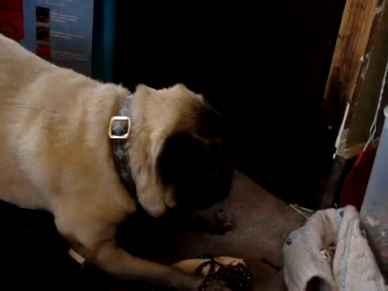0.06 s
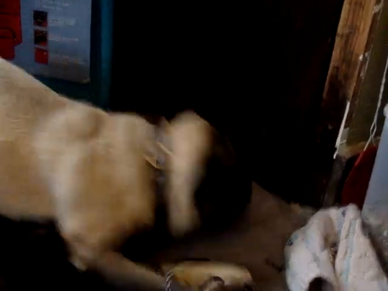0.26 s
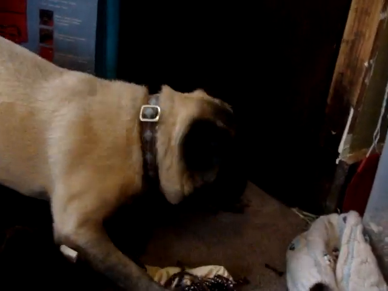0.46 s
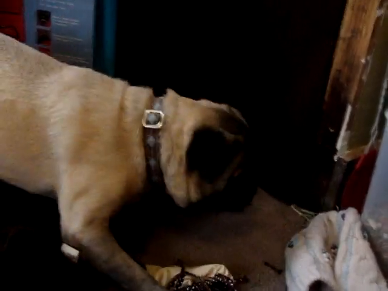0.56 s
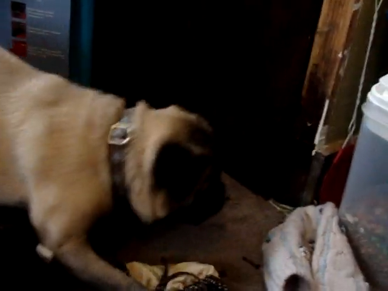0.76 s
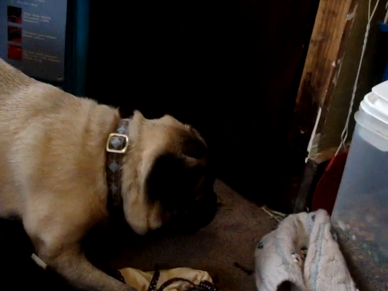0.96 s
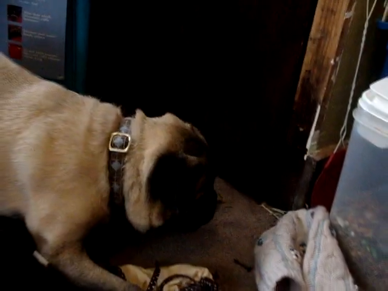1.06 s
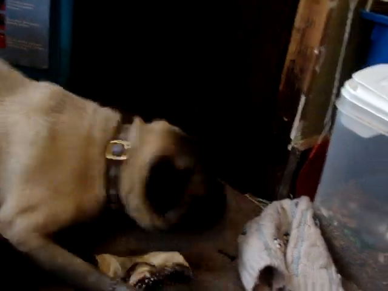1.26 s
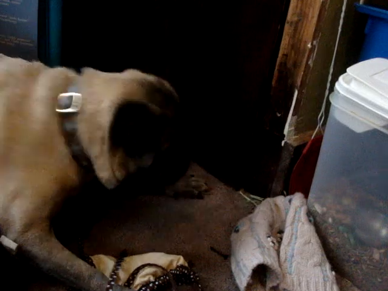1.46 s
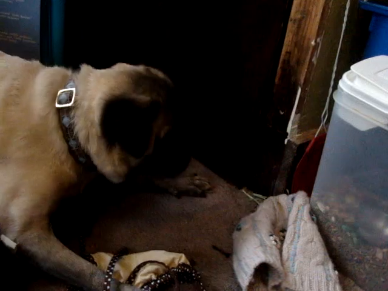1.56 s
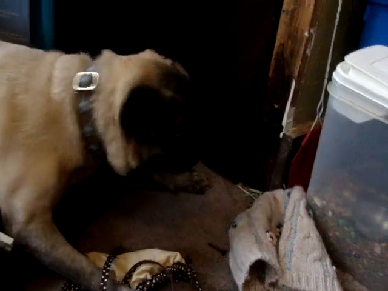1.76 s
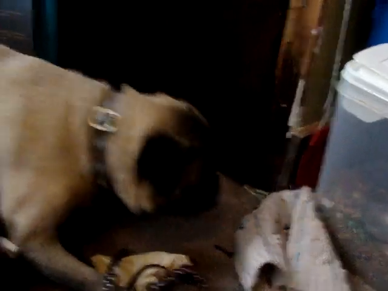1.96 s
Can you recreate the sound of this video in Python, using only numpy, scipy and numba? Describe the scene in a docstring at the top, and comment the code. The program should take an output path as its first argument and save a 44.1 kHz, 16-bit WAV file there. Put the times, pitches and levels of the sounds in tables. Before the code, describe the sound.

A small dog barks sharply three times close by, whimpering and wheezing, in a quiet room.

```python
"""In a quiet, soft room a small flat-faced dog barks three times close by; a whimper joins the last two.
Its larynx runs two oscillators at once, clean as the bark rises, rough and noisy at full force, and
the resonances of throat, mouth and muzzle filter this source. Between barks turbulent air wheezes in
the narrow nose and the soft palate flutters. Thin whistles sound between and during the calls, with a
bright 4 kHz edge as the second bark starts. The paws thump once over a steady hush."""
import sys
import numpy as np
from scipy import signal
from scipy.fft import rfft, irfft
from scipy.io import wavfile
from scipy.ndimage import uniform_filter1d
from numba import njit

SR = 44100
rng = np.random.default_rng(int(sys.argv[2]) if len(sys.argv) > 2 else 0)


def materialize(psi):
    """Save the field psi as 16-bit PCM at rate SR to the path in sys.argv[1].

    A 1-D psi becomes a single channel; in a 2-D psi each row is a channel.
    """
    bounded = np.clip(np.atleast_2d(psi).T, -1, 1)
    quanta = np.round(bounded * 32767).astype(np.int16)
    wavfile.write(sys.argv[1], SR, quanta)


N = 88200

# spectrum of the room's hush: f/Hz, relative density/dB
HUSH_SPECTRUM = [(25, -8), (112, -6.5), (204, -3.5), (3030, -15), (5260, -13.5), (9820, -20.5)]
# wheezing breaths, one list each: t/s, level/dB
BREATHS = [
    [(.125, -47), (.148, -41), (.153, -31.5), (.18, -36.5), (.22, -36)],
    [(.61, -58), (.65, -59), (.82, -53.5), (.9, -47), (.93, -68.5), (1.14, -55.5), (1.17, -47.5),
     (1.2, -60)],
    [(1.94, -70.5), (1.99, -58)],
]
# nasal resonances: f/Hz, bandwidth/Hz, gain/dB
NOSE_RESONANCES = [(556, 560, 3.5), (1495, 1600, -5.5), (2770, 560, 2.5), (5210, 810, -1.5),
                   (8160, 5800, -15.5)]
# thin whistles and the second bark's bright edge: t/s, duration/s, starting f/Hz, final f/Hz, level/dB
WHISTLE_GLIDES = [(0.149, 0.031, 2950, 3820, -31), (0.623, .11, 2930, 2860, -51.5),
                  (0.764, 0.142, 2830, 2700, -56), (1.224, 0.047, 3940, 4370, -34),
                  (1.389, 0.096, 3130, 2670, -39.5)]
# flaps of the soft palate: t/s, level/dB, extra gain of the lowest mode/dB
PALATE_FLAPS = [(0.152, -30.5, -1), (0.69, -49, 4.5), (0.725, -47.5, -2), (0.859, -34.5, 1),
                (0.89, -43.5, -10), (0.908, -48.5, 7), (1.143, -45.5, 14), (1.174, -35, -2),
                (1.194, -34, 0.5)]
# airway modes struck by a flap: f/Hz, gain/dB, T60/s
AIRWAY_MODES = [(184, 2, 0.046), (516, 9.5, 0.02), (1160, 1, 0.0039), (4070, 1.5, 0.0044)]
# paws shifting on the floor: t/s, impulse level/dB
PAW_THUMPS = [(0.192, -23.5)]
# upper vibration of the vocal folds: t/s, f/Hz, roughness (0 clean, about 1 noisy)
UPPER_VIBRATION = [(.24, 522, 0), (.265, 653.4, 0.06), (.283, 707.7, 0.13), (.29, 762, 0.8),
                   (.33, 695.7, 0.72), (.375, 788.3, 0.82), (.388, 729.7, 0.31), (.408, 553, 0.39),
                   (.415, 598.2, 1.02), (1.23, 591.3, .3), (1.28, 636.5, 0.51), (1.31, 680.2, 0.42),
                   (1.345, 655.1, 0.55), (1.375, 698.8, 0.54), (1.41, 427.8, 0.58), (1.45, 301.8, 0.59),
                   (1.515, 266.4, 0.41), (1.55, 464.3, 0.07), (1.585, 627.7, 0.07), (1.612, 728.5, 0.06),
                   (1.626, 741.7, 0.84), (1.7, 740, 0.81), (1.73, 656.8, 0.6), (1.785, 242, 0.57),
                   (1.8, 207.9, 1.06)]
# lower vibration: t/s, f/Hz, weight relative to the upper/dB
LOWER_VIBRATION = [(.225, 323.7, 43), (.236, 354.6, 6.5), (.245, 358.8, -5), (.275, 431, -8),
                   (.3, 485.3, -1.5), (.36, 449.8, -4.5), (.42, 389.4, -28), (1.225, 200.4, 7),
                   (1.24, 327.7, 45), (1.255, 429.5, 25.5), (1.28, 480, -5.5), (1.345, 466, -1),
                   (1.375, 335.6, -15), (1.42, 207.3, -2), (1.45, 200.1, -46), (1.6, 441.7, -25),
                   (1.625, 460.9, 3), (1.69, 476.2, -24.5), (1.72, 457.6, -15)]
# calls, one list each: t/s, throat level/dB, mouth level/dB re throat, muzzle level/dB re throat
CALL_LEVELS = [
    [(.222, -35.5, -28, -12), (.238, -21.5, -41, -13), (.244, -8.5, -15.5, -38), (.28, -12.5, -4.5, -20),
     (.294, -16, -4.5, -1), (.334, -14.5, -4, -25), (.378, -22.5, -3, -3.5), (.4, -16.5, -17, -12.5),
     (.412, -32.5, -8.5, -3.5), (.54, -50, -2, 2.5), (.59, -61, -2, -9)],
    [(1.228, -13, -30, -32), (1.24, -16, -5.5, -12), (1.26, -9, -11, -12.5), (1.284, -14.5, -7, -7.5),
     (1.318, -10.5, -10.5, -32.5), (1.34, -15.5, -12.5, -0.5), (1.37, -17, -12, -12),
     (1.41, -29, -8.5, -15), (1.48, -32.5, -18.5, -16), (1.538, -30, -12.5, -24.5), (1.572, -18, 2.5, 4.5),
     (1.586, -8.5, -9.5, -28), (1.61, -22, 10, 6), (1.69, -22, 7, -20), (1.74, -31, 3, -5.5),
     (1.79, -41.5, -3.5, -9.5), (1.91, -69, 2.5, 10.5)],
]
# formants moving as the mouth opens and shuts: t/s, throat f/Hz, mouth f/Hz
FORMANT_PATHS = [(0.229, 346, 1320), (0.248, 497, 1660), (0.281, 840, 1760), (0.391, 673, 1770),
                 (1.227, 581.7, 1604), (1.255, 914.6, 1501), (1.284, 664.2, 1415), (1.349, 689.1, 1775),
                 (1.39, 665.6, 1528), (1.452, 327.4, 1336), (1.521, 293, 1350), (1.552, 463, 1450),
                 (1.578, 594, 1870), (1.613, 640, 1920), (1.63, 660, 1364), (1.719, 655, 1530),
                 (1.785, 276, 1480), (1.813, 462, 1437)]
# stationary resonances of muzzle, rasp and hiss: f/Hz, bandwidth/Hz, gain/dB
MUZZLE_RESONANCES = [(2820, 650, 0)]
RASP_RESONANCES = [(3604, 380, 5), (5010, 770, 0)]
HISS_RESONANCES = [(6240, 350, 3.5), (8510, 770, -1)]
# treble of the calls: t/s, rasp level/dB re throat, hiss level/dB re throat
TREBLE_LEVELS = [(.26, -26.5, -40), (.3, -13, -31), (.4, -14.5, -32), (.42, -4, -16), (1.245, -18, -25.5),
                 (1.285, -23.5, -41), (1.345, -6.5, -31.5), (1.5, -36.5, -30), (1.575, -25.5, -37.5),
                 (1.62, -4, -29), (1.75, -21.5, -25)]

JITTER, SHIMMER_DB = 0.15, 9.5  # spread of relative pitch and of level at roughness 1
BREATHY_DB, COUPLING = 2, 0.41
FORMANT_WIDTHS_HZ, FORMANT_BYPASS = (320, 383), 0.1  # throat and mouth; share passing unfiltered
HUSH_DB, ROOM_DB = -55, -12


def amp(db):
    """Amplitude ratio: a factor of ten per 20 dB."""
    return 10 ** (np.asarray(db) / 20)


def curves(rows):
    """Linear interpolation of each column over time."""
    times, *columns = np.transpose(rows)
    return [np.interp(np.arange(N) / SR, times, column) for column in columns]


def envelopes(events):
    """Interpolation of successive events, each rising from and falling to -90 dB."""
    rows = []
    for event in events:
        first, last = event[0], event[-1]
        rows += [(first[0] - .004, -90, *first[2:]), *event, (last[0] + .02, -90, *last[2:])]
    return curves(rows)


def drift(rate_hz):
    """Low-pass filtering of noise gives a slow fluctuation of unit variance."""
    r = np.exp(-2 * np.pi * rate_hz / SR)
    slow = signal.lfilter([1], [1, -2 * r, r * r], rng.standard_normal(N + 4000))[4000:]
    return slow / slow.std()


def unit_band(x, band_hz):
    """Band-pass filtering, then division by the running RMS, gives a band of unit level."""
    band = signal.sosfilt(signal.butter(2, band_hz, "band", fs=SR, output="sos"), x)
    return band / np.sqrt(uniform_filter1d(band ** 2, 450) + 1e-12)


def resonate(x, resonances):
    """Superposition of parallel resonators with alternating signs."""
    out = 0
    for k, (hz, width_hz, db) in enumerate(resonances):
        r = np.exp(-np.pi * width_hz / SR)
        poles = [1, -2 * r * np.cos(2 * np.pi * hz / SR), r * r]
        out += (-1) ** k * amp(db) * signal.lfilter([(1 - r * r) / 2, 0, (r * r - 1) / 2], poles, x)
    return out


@njit
def glide(x, hz, width_hz):
    """Forced response of a resonator whose centre frequency moves."""
    turn, r = 2 * np.pi * hz / SR, np.exp(-np.pi * width_hz / SR)
    y = np.zeros(len(x))
    for i in range(2, len(x)):
        y[i] = (1 - r * r) / 2 * (x[i] - x[i - 2]) + 2 * r * np.cos(turn[i]) * y[i - 1] - r * r * y[i - 2]
    return y


def ring(times, gains, hz, t60_s):
    """Impulse response of a damped mode: each impulse starts a decaying sinusoid."""
    impulses = np.zeros(N) + 1e-18
    impulses[(times * SR).astype(int)] = gains
    r, turn = amp(-60 / (t60_s * SR)), 2 * np.pi * hz / SR
    return signal.lfilter([0, np.sin(turn)], [1, -2 * r * np.cos(turn), r * r], impulses)


def room_hush():
    """Stationary noise: white noise weighted by a fixed spectrum."""
    hz, db = np.transpose(HUSH_SPECTRUM)
    bins_hz = np.maximum(np.arange(N // 2 + 1) * SR / N, 1)
    weights = amp(np.interp(np.log(bins_hz), np.log(hz), db))
    noise = irfft(rfft(rng.standard_normal(N)) * weights, N)
    return amp(HUSH_DB) * noise / noise.std()


def nose_wheeze():
    """Turbulence excites the broad resonances of the narrow nose."""
    turbulence = rng.standard_normal(N) * amp(2.0 * drift(66))
    air = resonate(turbulence, NOSE_RESONANCES)
    return amp(envelopes(BREATHS)[0]) * air / air.std()


def whistles(width_hz=160):
    """Sharp resonance selects a gliding pitch from noise: thin whistles and a bark's bright edge."""
    t, air, out = np.arange(N) / SR, rng.standard_normal(N), 0
    for start, duration, from_hz, to_hz, db in WHISTLE_GLIDES:
        progress = np.clip((t - start) / duration, 0, 1)
        hz = from_hz + (to_hz - from_hz) * progress
        tone = glide(glide(air, hz, width_hz), hz, width_hz)
        swell = np.sqrt(np.abs(np.sin(np.pi * progress)))
        out += amp(db) * swell * tone / tone.std()
    return out


def palate_flutter():
    """Impulsive excitation: each flap of the palate sets the airway's modes ringing briefly."""
    times, db, dull_db = np.transpose(PALATE_FLAPS)
    return sum(ring(times, amp(db + mode_db + (dull_db if k == 0 else 0)), hz, t60_s)
               for k, (hz, mode_db, t60_s) in enumerate(AIRWAY_MODES))


def paw_thump():
    """A soft impact spreads its force over time and rings one low, damped mode."""
    times, db = np.transpose(PAW_THUMPS)
    return uniform_filter1d(ring(times, amp(db), hz=70.2, t60_s=0.052), size=150)


def fold_vibration(pitch_hz, roughness, tilt, top_hz=4600):
    """A harmonic series, modulated at random in pitch and amplitude; returns sound and phase."""
    phase = 2 * np.pi * np.cumsum(pitch_hz * (1 + JITTER * roughness * drift(137.84))) / SR
    tone = sum(np.cos(k * phase + k * k) * k ** -tilt * np.clip((top_hz - k * pitch_hz) / 800, 0, 1)
               for k in range(1, 22))
    return tone * amp(SHIMMER_DB * roughness * drift(90)), phase


def larynx():
    """Biphonation: the lower vibration modulates the upper; returns the full source and air puffs."""
    upper_hz, roughness = curves(UPPER_VIBRATION)
    lower_hz, balance_db = curves(LOWER_VIBRATION)
    upper, upper_phase = fold_vibration(upper_hz, roughness, tilt=0.98)
    lower, lower_phase = fold_vibration(lower_hz, .65 * roughness, tilt=1.0)
    upper_gain, lower_gain = amp(-np.maximum(balance_db, 0)), amp(np.minimum(balance_db, 0))
    puffs = rng.standard_normal(N) * (1 + .5 * np.cos(upper_phase))
    tonal_share = np.clip(1 - roughness ** 3, 0, 1)  # the upper tone gives way to noise
    modulation = 1 + COUPLING * lower_gain * np.cos(lower_phase)
    breath = amp(BREATHY_DB) * (roughness + 0.044) * puffs
    return upper_gain * tonal_share * upper * modulation + lower_gain * lower + breath, puffs


def barks_and_whimper():
    """Source-filter principle: airway resonances shape the sound of the larynx in five bands."""
    source, puffs = larynx()
    level_db, mouth_db, muzzle_db = envelopes(CALL_LEVELS)
    rasp_db, hiss_db = curves(TREBLE_LEVELS)
    throat, mouth = (FORMANT_BYPASS * source + glide(source, hz, width_hz)
                     for hz, width_hz in zip(curves(FORMANT_PATHS), FORMANT_WIDTHS_HZ))
    muzzle = resonate(resonate(source, MUZZLE_RESONANCES), MUZZLE_RESONANCES)
    rasp = resonate(resonate(source, RASP_RESONANCES), RASP_RESONANCES)
    hiss = resonate(puffs, HISS_RESONANCES)
    bands = ((throat, 0, [170, 1100]),
             (mouth, mouth_db, [1050, 2450]),
             (muzzle, muzzle_db, [2300, 3500]),
             (rasp, rasp_db + 3.1 * drift(45), [3400, 5600]),  # the treble flickers
             (hiss, hiss_db + 4.0 * drift(45), [5600, 12000]))
    return amp(level_db) * sum(amp(db) * unit_band(x, band_hz) for x, db, band_hz in bands)


def reverberation(x, t60_s=0.089):
    """Diffuse reflections decay exponentially, and fast in a soft, absorbent room."""
    t = np.arange(SR // 2) / SR
    tail = rng.standard_normal(len(t)) * amp(-60 * t / t60_s) * (t > .004)
    return signal.fftconvolve(x, tail / np.sqrt(np.sum(tail ** 2)))[:N]


def scene():
    """Superposition of the dog, its reverberation, its paws and the hush."""
    dog = barks_and_whimper() + nose_wheeze() + whistles() + palate_flutter()
    return (dog + amp(ROOM_DB) * reverberation(dog) + paw_thump() + room_hush())[None]


def record(dry):
    """Saturation and band limiting: a small microphone rounds peaks, thins the bass, cuts the top."""
    ceiling, low_hz, high_hz = .68, 75.6, 9950
    rounded = dry / (1 + (np.abs(dry) / ceiling) ** 12) ** (1 / 12)
    thinned = signal.sosfilt(signal.butter(2, low_hz, "high", fs=SR, output="sos"), rounded)
    return signal.sosfilt(signal.ellip(12, 1, 60, high_hz, fs=SR, output="sos"), thinned)


dry = scene()
out = record(dry)
materialize(out)
```